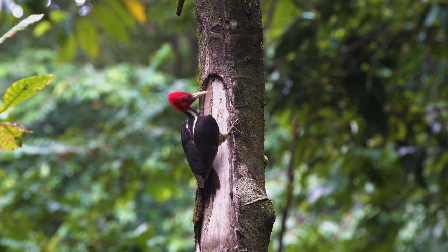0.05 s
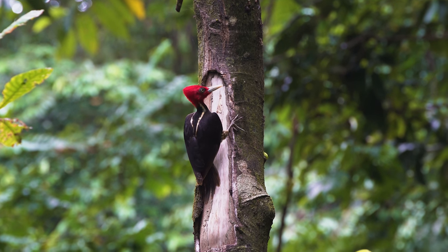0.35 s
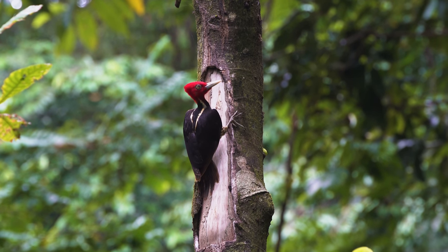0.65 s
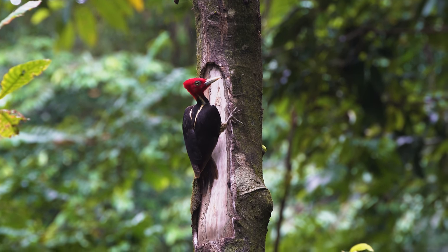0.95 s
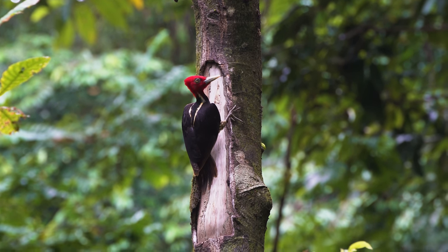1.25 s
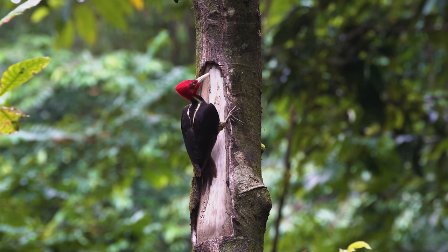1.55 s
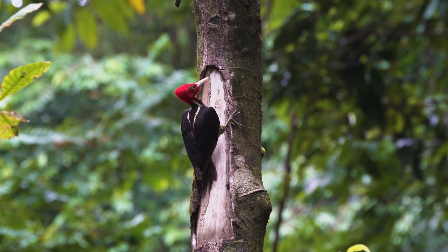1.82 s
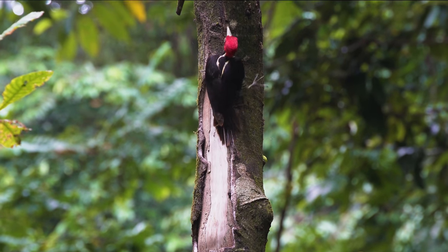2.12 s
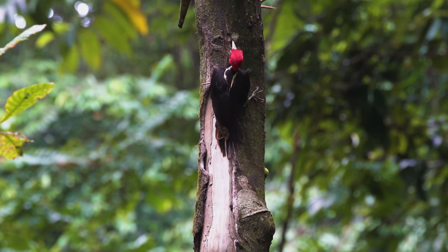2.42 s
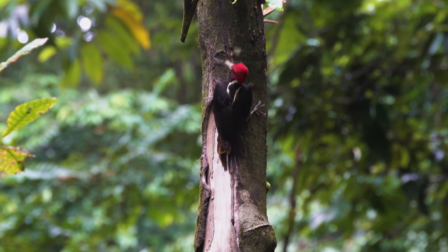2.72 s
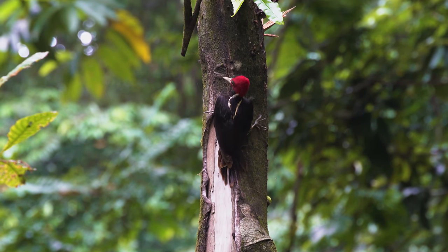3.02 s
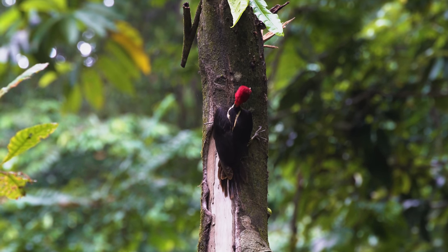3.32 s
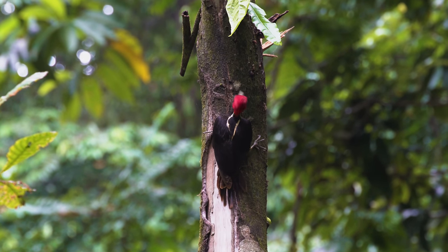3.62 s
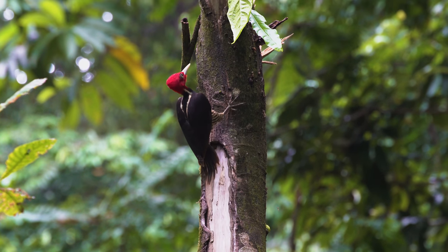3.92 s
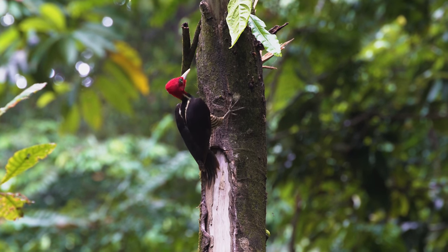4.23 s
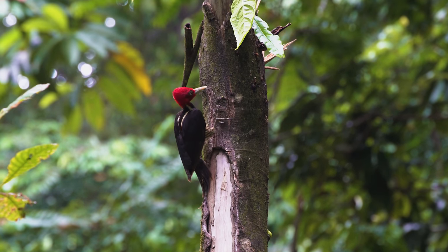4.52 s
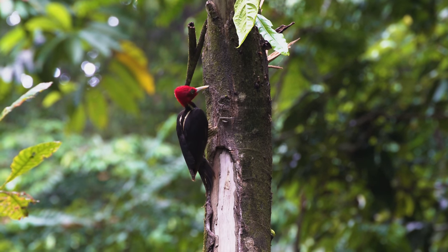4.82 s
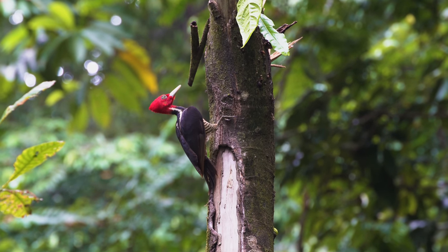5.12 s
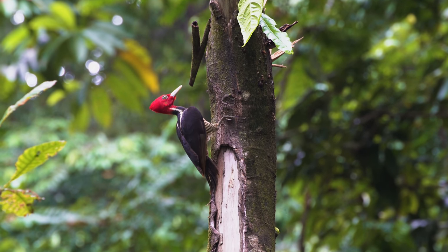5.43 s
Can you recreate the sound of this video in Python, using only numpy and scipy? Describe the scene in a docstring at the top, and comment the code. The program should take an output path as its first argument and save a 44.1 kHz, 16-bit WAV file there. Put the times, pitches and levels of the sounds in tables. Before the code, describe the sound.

In a forest, a high cicada chorus buzzes all around the microphone without a break. A few light knocks and scrapes come from a woodpecker on a trunk, and a far bird gives some thin notes. The woodpecker's claws click several times in the middle, followed by sparse soft scuffs. A low, faraway roar with a faint engine hum sinks and later builds again.

```python
"""Cicadas buzz in a forest: each clicks a small drum, its tymbal, and its body rings near 8 kHz.
The trees blur their song. A woodpecker shifts and climbs on a trunk, ticking and scuffing
the bark with claws and bill. A small bird calls faintly. Behind it all a distant low roar
ebbs, uncovers the weak drone of an engine, and swells again."""
import sys
import numpy as np
from scipy import signal
from scipy.fft import rfft, irfft
from scipy.io import wavfile

SR = 44100
rng = np.random.default_rng(int(sys.argv[2]) if len(sys.argv) > 2 else 0)


def inscribe(sig):
    """Save sig as 16-bit PCM at rate SR to the path in sys.argv[1].

    A 1-D sig is mono; a 2-D sig holds one channel per row.
    Samples are clipped to [-1, 1] before scaling.
    """
    pcm = np.round(np.clip(np.atleast_2d(sig).T, -1, 1) * 32767)
    wavfile.write(sys.argv[1], SR, pcm.astype(np.int16))


N = 249606
TIME = np.arange(N) / SR
FREQS = np.fft.rfftfreq(N, 1 / SR)


def cicada(hz, width, db, clicks_per_s, pan_db, jitter=.0042, rough=.42, throb_db=1.5):
    """A tymbal buckles at a nearly steady rate, and each click rings the hollow body."""
    cycles = np.cumsum(clicks_per_s * (1 + jitter * wander(25))) / SR + rng.random()
    clicks = np.diff(np.floor(cycles), prepend=0)  # one click per cycle
    clicks *= 1 + rough * rng.standard_normal(N)
    song = resonate(clicks, hz, width) * gain_of(throb_db * wander(60))
    heard = forest(song, wet_db=.5, echo_s=.44, lag_s=.00002)
    return gain_of(db + np.array([[pan_db], [-pan_db]]) / 2) * unit_level(heard)


# near cicadas: body ring f/Hz, width/Hz, level/dB, click rate/Hz, left minus right/dB
NEAR_CICADAS = [(6400, 1050, -49.5, 206, 3), (7200, 130, -49.5, 312.4, 8), (7476, 240, -48.5, 206.5, -4.5),
                (7834, 210, -45, 312.4, -2.5), (7956, 185, -45, 207.3, -6), (8275, 250, -57, 205.5, -10),
                (8780, 310, -53, 177, -3)]
# tone of the far cicadas: f/Hz, relative level/dB
FAR_CICADAS = [(4800, -40), (5450, -22), (5800, -11.5), (6100, -6), (6750, -3), (7100, -2), (7600, -4),
               (7950, 1), (8400, -2), (8800, -3), (9100, -10), (10000, -14.5), (11500, -18.5), (13000, -32)]
# all work up to full song: start t/s, ease-off t/s, added level/dB relative to the quiet song
FULL_SONG = [(.75, 4.85, .4)]

def cicada_chorus():
    """Near cicadas and a blur of countless far ones grow louder together, hold, and slowly tire."""
    effort = unit_level(swells(FULL_SONG, rest_db=0, rise_s=1.5, fall_s=4))
    far = gain_of(-40.5 + .5 * wander(45)) * airy_noise(FAR_CICADAS, lag_s=.000017)
    near = sum(cicada(*row) for row in NEAR_CICADAS)
    return effort * (far + near)


# short buzzes: loudest t/s, fade time/s, ring f/Hz, width/Hz, level/dB, click rate/Hz
SHORT_BUZZES = [(.59, 0.1, 8130, 260, -40.5, 204), (2.98, .07, 7850, 500, -38, 204),
                (4.0, 0.45, 10600, 3600, -51, 170)]

def buzzes():
    """Single insects join in for a moment."""
    return sum(cicada(hz, width, db, rate, pan_db=2) * hump(s, fade_s)
               for s, fade_s, hz, width, db, rate in SHORT_BUZZES)


# tone of the smaller insects: f/Hz, relative level/dB
SIZZLE_TONE = [(9000, -24), (11000, -10), (12300, -8), (13500, -3), (14700, 0), (16000, -3.5)]
# their louder spells: start t/s, ease-off t/s, added level/dB
SIZZLE_SWELLS = [(-.25, 3.98, -54.5), (4.55, 5.7, -51.2)]

def small_insects():
    """Smaller insects make a thin, high sizzle that swells and eases."""
    level = swells(SIZZLE_SWELLS, rest_db=-54.1, rise_s=1.2, fall_s=.42)
    flicker = gain_of(.4 * wander(60))
    return level * flicker * airy_noise(SIZZLE_TONE)


# ticks of claws and bill: t/s, wood level/dB, snap level/dB, sharp edge level/dB
CLAW_TICKS = [(.128, -36, -31, -26), (.449, -43, -29, -30), (1.788, -46, -30, -46),
              (2.0502, -35.5, -23, -21), (2.0947, -50, -34, -21.5), (2.391, -40, -23, -23),
              (2.5761, -38, -26, -25), (2.5808, -45, -22, -20), (2.6875, -43, -22, -44)]
# the four rings of a tick (tock, wood, snap, sharp edge): f/Hz, width/Hz
BARK_RINGS = [(950, 700), (2050, 660), (6300, 2700), (10700, 6000)]

def woodpecker_ticks(crumble_db=-20, crumble_s=.0008, tock_db=-5):
    """A claw snaps into the bark, which crumbles for a moment; the trunk answers with a dull tock."""
    out, t = np.zeros(N), TIME[:1024]
    for s, wood_db, snap_db, edge_db in CLAW_TICKS:
        crumble = gain_of(crumble_db) * rng.standard_normal(len(t)) * np.exp(-t / crumble_s)
        blow = (t == 0) + crumble
        for db, (hz, width) in zip((wood_db + tock_db, wood_db, snap_db, edge_db), BARK_RINGS):
            ring = resonate(blow, hz, width)
            add(out, s, gain_of(db) * ring / abs(ring).max())
    return forest(out, wet_db=-5, echo_s=.04)


# knocks and scuffs on the bark: t/s, level/dB, f/Hz, width/Hz, fade time/s
BARK_SCUFFS = [(.128, -36.3, 2400, 10000, 0.015), (.448, -38.5, 3700, 7500, 0.015),
               (1.278, -49, 2700, 4500, .03), (1.326, -50, 2800, 4000, 0.015),
               (1.534, -40.3, 1370, 1500, 0.026), (1.555, -52, 5000, 2400, 0.03),
               (1.79, -49.5, 3220, 3500, 0.021), (2.866, -45, 2900, 3200, .024),
               (3.39, -50, 3500, 4500, .04), (4.09, -45, 1800, 2400, .015)]

def woodpecker_scuffs(rise_s=.0006, grains_per_s=6000):
    """Bill and feet knock and slip over rough bark: a dying shower of tiny clicks."""
    out, t = np.zeros(N), TIME[:SR // 4]
    for s, db, hz, width, fade_s in BARK_SCUFFS:
        grains = rng.standard_normal(len(t)) * (rng.random(len(t)) < grains_per_s / SR)
        shape = (1 - np.exp(-t / rise_s)) * np.exp(-t / fade_s)
        add(out, s, gain_of(db) * unit_level(resonate(grains, hz, width)) * shape)
    return forest(out, wet_db=-4, echo_s=.11, lag_s=.00005)


# faint bird notes: t/s, length/s, start f/Hz, end f/Hz, level/dB
BIRD_NOTES = [(0.878, 0.13, 5530, 5300, -57), (1.037, 0.045, 4200, 4270, -54.5),
              (1.08, .08, 5130, 4870, -54), (1.121, 0.093, 4370, 3940, -56.5)]

def small_bird(rasp_hz=370):
    """Thin, sliding notes from deep among the trees; a fast wobble in pitch makes them raspy."""
    out = np.zeros(N)
    for s, length, start_hz, end_hz, db in BIRD_NOTES:
        n = int(length * SR)
        hz = np.linspace(start_hz, end_hz, n) + rasp_hz * wander(500)[:n]
        whistle = np.sin(2 * np.pi * np.cumsum(hz) / SR)
        add(out, s, gain_of(db) * whistle * signal.windows.tukey(n, .5))
    return forest(out, wet_db=5, echo_s=.66)


# tones of the quiet roar, loud roar, rumble and leaves: f/Hz, relative level/dB
QUIET_ROAR = [(110, -43), (170, -20), (220, -7), (300, -8), (400, -3), (520, -3.5), (680, -5), (850, -2),
              (1300, -7.5), (2000, -11.5), (2800, -17), (5000, -22), (6500, -42)]
LOUD_ROAR = [(110, -65), (180, -13.5), (222, -5.5), (337, -6), (438, -1.5), (533, -3), (612, 0),
             (684, -3.5), (929, -2), (1210, -4.5), (1370, -5), (3390, -17.5), (5000, -21.5), (6500, -65),
             (11000, -120)]
RUMBLE_TONE = [(20, -30), (35, -23), (60, -10), (90, 0.5), (135, 3), (155, -0.5), (170, -16), (220, -10),
               (400, -28)]
LEAF_HISS = [(1200, -21), (2500, 3), (4000, -2.5), (5500, 1.5), (9000, -12.5), (16000, -20)]
# one swell ebbs and the next builds: start t/s, ease-off t/s, added level/dB
LONG_SWELLS = [(-2.5, 0, -46.4), (2.8, 5.7, -41.9)]

def distant_roar(rest_db=-50.1, rise_s=2.1, fall_s=2.05, split_hz=620):
    """A far roar swells and ebbs, its treble ahead of its bass, with rumble below and leaf hiss above."""
    bass_level = swells(LONG_SWELLS, rest_db, rise_s, fall_s)
    treble_level = swells(LONG_SWELLS, rest_db, rise_s, fall_s, lead_s=.24)
    growth = np.log(treble_level / treble_level.min())
    loud_share = np.clip(1.24 * growth / growth.max(), 0, 1)
    roar = np.sqrt(1 - loud_share) * airy_noise(QUIET_ROAR) + np.sqrt(loud_share) * airy_noise(LOUD_ROAR)
    bass = irfft(rfft(roar) / (1 + (FREQS / split_hz) ** 4), N)
    rumble = gain_of(-26.5) * airy_noise(RUMBLE_TONE)
    leaves = gain_of(-61.7) * airy_noise(LEAF_HISS)
    return bass_level * (bass + rumble) + treble_level * (roar - bass) + leaves


# hums of a far engine: f/Hz, width/Hz, level/dB, loudest t/s, fade time/s
ENGINE_HUMS = [(75.5, 9.7, -78, 2.4, 12), (377, 50, -57, 1.25, 1.2), (562, 21, -60, 1.9, 1.15),
               (821, 160, -62, 1.8, 1.1)]

def far_engine():
    """An engine's blurred tones drift in and out."""
    out = np.zeros(N)
    for hz, width, db, s, fade_s in ENGINE_HUMS:
        phase = 2 * np.pi * hz * TIME
        hum = wander(width / 2) * np.cos(phase) + wander(width / 2) * np.sin(phase)
        out += gain_of(db) * hump(s, fade_s) * unit_level(hum)
    return out


# how alike left and right sound: f/Hz, likeness (1 = the same)
LIKENESS = [(160, 1), (330, .98), (500, 0.8), (770, 0.73), (1170, .46), (1800, 0.27), (2800, -0.15),
            (4200, -0.12), (6400, 0.07), (9800, 0.7), (15000, 0.05)]
# which side is louder: f/Hz, left minus right/dB
BALANCE = [(150, 0.5), (500, 3.5), (1200, 3), (2700, 0.5), (6400, 0), (8500, 0), (11000, 1), (14500, 4)]

def airy_noise(tone, lag_s=0):
    """Noise from all around: alike on both sides in the bass, less so higher up, lag_s late on the left."""
    left, other = rfft(rng.standard_normal((2, N)))
    alike, lean_db = np.clip(curve(LIKENESS), -1, 1), curve(BALANCE) / 2
    right = alike * left + np.sqrt(1 - alike ** 2) * other
    delay = np.exp(-2j * np.pi * FREQS * lag_s)
    pair = np.array([left * gain_of(lean_db) * delay, right * gain_of(-lean_db)])
    sound = irfft(pair * gain_of(curve(tone)), N)
    return sound / np.std(sound.mean(0))


def forest(x, wet_db, echo_s, lag_s=0):
    """The direct sound, lag_s late on the left, plus echoes off trunks and leaves at wet_db."""
    t = TIME[:SR // 2]
    tail = rng.standard_normal((2, len(t))) * gain_of(-60 * t / echo_s)
    echoes = signal.fftconvolve(x[None], tail / np.linalg.norm(tail[0]), axes=1)[:, :N]
    left = irfft(rfft(x) * np.exp(-2j * np.pi * FREQS * lag_s), N)
    return np.array([left, x]) + gain_of(wet_db) * echoes


def swells(rows, rest_db, rise_s, fall_s, lead_s=0):
    """Gain of a steady sound with swells on top: the power of each rises, holds, and falls."""
    t, power = TIME + lead_s, gain_of(rest_db) ** 2
    for start, ease_off, db in rows:
        rise = np.clip((t - start) / rise_s, 0, 1)
        fall = np.clip(1 - (t - ease_off) / fall_s, 0, 1)
        power = power + gain_of(db) ** 2 * rise * fall
    return np.sqrt(power)


def hump(s, fade_s):
    """A smooth fade in and out, loudest at time s."""
    return np.exp(-((TIME - s) / fade_s) ** 2)


def resonate(x, hz, width):
    """Makes a sound ring near hz, filtering twice for a cleaner ring."""
    b, a = signal.iirpeak(hz, hz / width, SR)
    return signal.lfilter(b, a, signal.lfilter(b, a, x))


def wander(hz):
    """A random wobble, up to about hz times a second."""
    return unit_level(irfft(rfft(rng.standard_normal(N)) / (1 + (FREQS / hz) ** 4), N))


def curve(points):
    """Joins a table's points into a curve over all frequencies."""
    hz, value = np.transpose(points)
    return np.interp(np.log(FREQS + 1), np.log(hz + 1), value)


def gain_of(db):
    """Turns decibels into a multiplier."""
    return 10 ** (np.asarray(db) / 20)


def unit_level(x):
    """Scales to an average level (rms) of one."""
    return x / np.sqrt(np.mean(x ** 2) + 1e-30)


def add(mix, s, sound):
    """Lays a sound into the mix at time s."""
    part = mix[round(s * SR):][:len(sound)]
    part += sound[:len(part)]


def scene():
    """Insects, birds and the far background, all together."""
    insects = cicada_chorus() + small_insects() + buzzes()
    background = distant_roar() + far_engine()
    birds = woodpecker_ticks() + woodpecker_scuffs() + small_bird()
    return insects + birds + background


def record(dry, top_hz=15850):
    """Cuts away the treble above top_hz."""
    lowpass = signal.firwin(1023, top_hz, window=("kaiser", 8), fs=SR)
    return signal.oaconvolve(dry, lowpass[None], "same")


dry = scene()
out = record(dry)
inscribe(out)
```